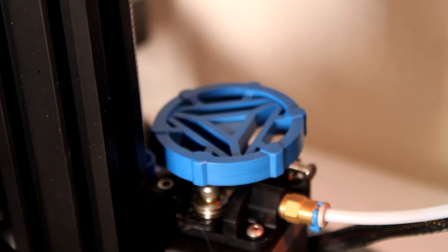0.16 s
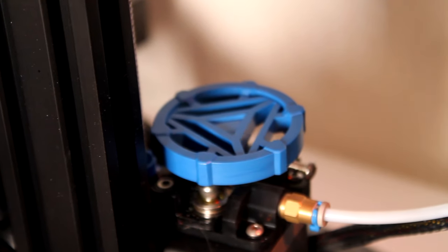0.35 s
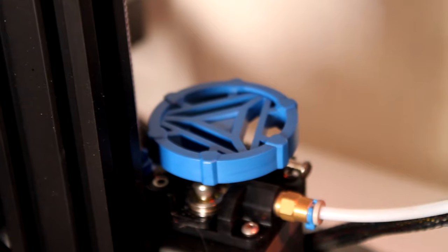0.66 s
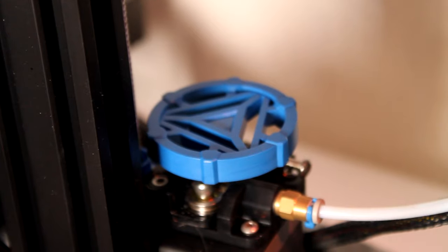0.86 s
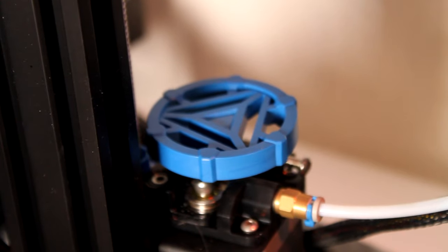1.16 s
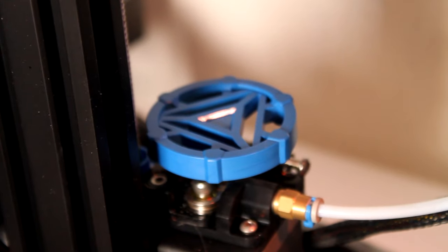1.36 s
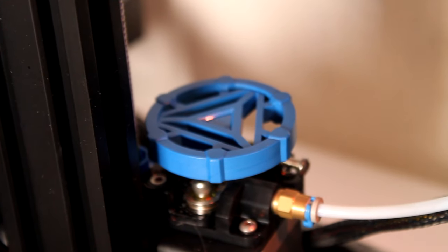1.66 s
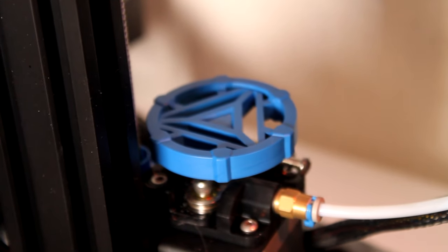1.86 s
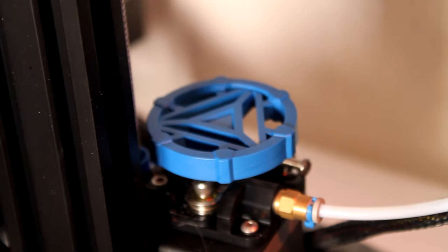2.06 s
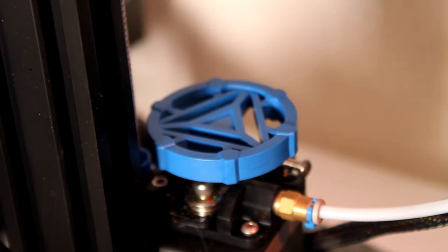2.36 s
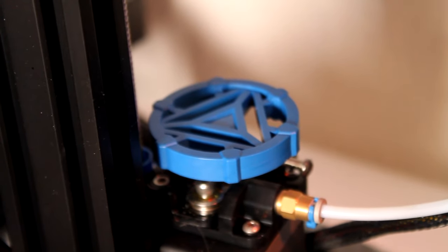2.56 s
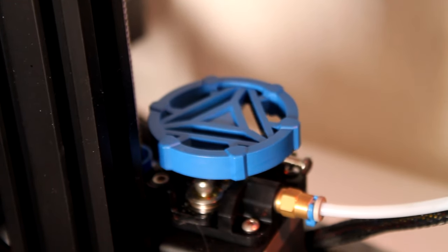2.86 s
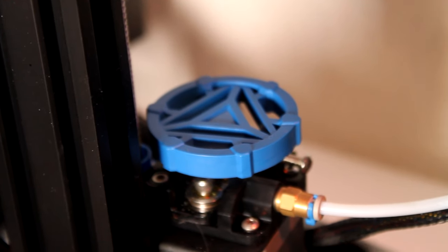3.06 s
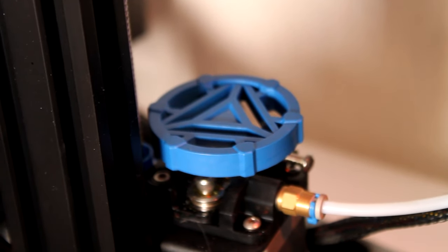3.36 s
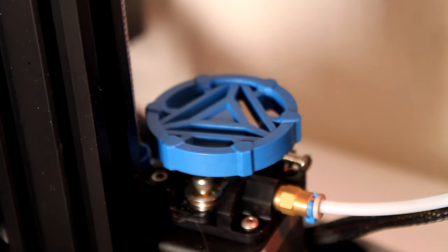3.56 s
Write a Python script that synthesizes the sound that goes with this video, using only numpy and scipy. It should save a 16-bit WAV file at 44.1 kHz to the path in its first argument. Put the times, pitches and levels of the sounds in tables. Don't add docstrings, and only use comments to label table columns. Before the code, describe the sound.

An extruder gear on a desktop 3D printer skips twice over continuous turbulent fan air with faint steady motor tones. The fan noise starts subdued and rises. At about 1.1 s comes a short, hard metallic snap with gritty crunch and dull frame knock; at 2.0 s a slightly longer crunch and heavier thump. After each, the background ducks, then recovers until 3.5 s. Small room, close phone microphone.

```python
import sys
import numpy as np
from scipy import signal
from scipy.fft import rfft, irfft
from scipy.io import wavfile

SR = 44100
rng = np.random.default_rng(int(sys.argv[2]) if len(sys.argv) > 2 else 0)


def field_ratio(decibels):
    return 10 ** (np.asarray(decibels, dtype=float) / 20)


def master_out(mix):
    frames = np.transpose(np.atleast_2d(mix))
    ceiling = np.clip(frames, -1, 1)
    pcm = np.round(ceiling * 32767).astype(np.int16)
    wavfile.write(sys.argv[1], SR, pcm)


N = 163611


def rms_one(x):
    return x / np.sqrt(np.mean(x ** 2) + 1e-20)


def since(s):
    return np.maximum(np.arange(N) / SR - s, 0)


def swell(t, peak_s):
    return t / peak_s * np.exp(1 - t / peak_s)


def drift(rate):
    hop = 40
    r = np.exp(-2 * np.pi * rate * hop / SR)
    slow = signal.lfilter([1], [1, -2 * r, r * r], rng.standard_normal(N // hop + 2002))[2000:]
    return np.interp(np.arange(N) / hop, np.arange(len(slow)), rms_one(slow))


def ring(force, hz, t60):
    r, w = field_ratio(-60 / (t60 * SR)), 2 * np.pi * hz / SR
    return signal.lfilter([0, np.sin(w)], [1, -2 * r * np.cos(w), r * r], force + 1e-18)


def sparse_impacts(per_s):
    return rng.standard_normal(N) * (rng.random(N) < per_s / SR)


def tooth_snap(t, snap_hz):
    burst_s, t60_s = .0011, .025
    envelope = (1 - np.exp(-t / burst_s)) ** 2 * np.exp(-np.log(1000) * t / t60_s)
    pair = np.sin(2 * np.pi * snap_hz * t) + .5 * np.sin(2 * np.pi * snap_hz * 0.96 * t)
    return 2 * envelope * pair


def feeder_crunch(t, length):
    # f/Hz, level/dB, t60/s
    feeder = [(1630, -9, 0.01), (2495, -10.5, 0.011), (3120, -4.5, 0.0077), (3850, -15.5, 0.011),
              (4340, -4, 0.0051), (5270, -10, 0.0089), (5590, -12, 0.0067), (6637, -7, 0.029),
              (7360, -17, 0.034), (10800, -10.5, 0.011), (11750, -13.5, 0.022), (13300, -12, 0.03),
              (15200, -23, .02)]
    rise_s, crunch_t60_s, rattle_t60_s, rattle_db = 0.00067, 0.083, 0.2, -13.5
    metal_db, crack_db, crack_fades = -4, -2, 0.83
    after, dying = np.maximum(t - length, 0), np.log(1000)
    decay = np.exp(-dying * after / crunch_t60_s)
    decay = decay + field_ratio(rattle_db) * np.exp(-dying * after / rattle_t60_s)
    shape = (1 - np.exp(-t / rise_s)) ** 2 * decay

    def grains(fades=1):
        return shape ** fades * rms_one(sparse_impacts(10000))

    metal = sum(field_ratio(level_db) * ring(grains(), hz, t60) / np.sqrt(t60 * SR / 30)
                for hz, level_db, t60 in feeder)
    crack = signal.lfilter([.5, .5], [1], grains(crack_fades))
    return field_ratio(metal_db) * metal + field_ratio(crack_db) * crack


def gear_bounces(t):
    # f/Hz, level/dB, t60/s
    bounced = [(6770, -15, 0.017), (10860, -19, .012), (13400, -27, .014)]
    hits = swell(t, .022) ** 2 * sparse_impacts(500)
    return sum(field_ratio(level_db) * ring(hits, hz, t60) for hz, level_db, t60 in bounced)


def frame_thump(t):
    # f/Hz, level/dB, swell/s
    frame = [(160, -12, .034), (335, -3, .021), (730, -9, .016), (1050, -8, .018)]
    modes = sum(field_ratio(level_db) * swell(t, peak_s) ** 4.5 * np.sin(2 * np.pi * hz * t)
                for hz, level_db, peak_s in frame)
    from_hz, to_hz, sag_s = 610, 490, .018
    turns = to_hz * t + (from_hz - to_hz) * sag_s * (1 - np.exp(-t / sag_s))
    knock = swell(t, .019) ** 3.3 * np.sin(2 * np.pi * turns)
    dull = signal.butter(2, [200, 1300], "band", fs=SR, output="sos")
    noise = rms_one(signal.sosfilt(dull, rng.standard_normal(N)))
    thud = field_ratio(-8.5) * swell(t, 0.02) * noise
    return modes + knock + thud


def skip(s, db, length, thump_db, snap_hz):
    t = since(s)
    bright = feeder_crunch(t, length) + gear_bounces(t) + field_ratio(-1.5) * tooth_snap(t, snap_hz)
    small_parts = signal.butter(2, 900, "high", fs=SR, output="sos")
    return field_ratio(db) * signal.sosfilt(small_parts, bright) + field_ratio(thump_db) * frame_thump(t)


def tones(lines, wobble_db):
    speed_wander = .0004
    turns = np.cumsum(1 + speed_wander * drift(1.53)) / SR
    total = 0
    for hz, db in lines:
        level = np.sqrt(2) * field_ratio(db + wobble_db * drift(3.6))
        total = total + level * np.sin(2 * np.pi * (hz * turns + rng.random()))
    return total


def rotor_hum():
    # [(multiple, rms level/dB)]
    rotors = [
        (122.8, [(1, -60), (4, -48), (5, -34), (9, -44)]),
        (156.2, [(5, -49), (8, -45), (10, -44), (16, -52)]),
        (531.3, [(3, -45), (4, -52), (6, -53), (7, -46), (8, -55), (9, -56)]),
    ]
    return sum(tones([(hz * k, db) for k, db in orders], .7) for hz, orders in rotors)


def motor_whine():
    # f/Hz, rms level/dB
    lone = [(139.5, -56), (284, -41), (350.3, -40), (2455, -53), (2923, -53), (3321, -52), (3852, -57),
            (5895, -60), (6110, -64), (7704, -66)]
    return tones(lone, 1.5)


def airflow():
    # f/Hz, level per Hz/dB
    broad = [(25, -25.5), (110, -29.5), (260, -16.5), (700, -11), (1500, -14.5), (4200, -20.5),
             (8500, -33.5), (15700, -43.5)]
    # f/Hz, width/Hz, boost/dB
    casing = [(134.7, 47, 7.5), (251, 34, -5), (334.7, 55, 7), (452, 49, -5.5), (650.5, 124, 8.5),
              (854, 75, 7.5), (897, 29, -1.5), (1023, 20, 8.5), (1182, 224, 4.5), (1559, 27, 5),
              (1850, 110, 5.5), (2558, 40, 6), (2760, 63, -2.5), (3480, 1900, 2.5), (6190, 500, -2),
              (7900, 600, 1.5), (9340, 1000, -2.5), (10440, 1400, 3)]
    air_db, flutter_db, flutter_hz = -26.5, 1, 2.7
    hz = np.maximum(np.arange(N // 2 + 1) * SR / N, 1)
    corner_hz, corner_db = np.array(broad).T
    db = np.interp(np.log(hz), np.log(corner_hz), corner_db)
    db = db + sum(boost * np.exp(-np.log(16) * ((hz - at) / width) ** 2) for at, width, boost in casing)
    db = db - 10 * np.log10(1 + (30 / hz) ** 8)
    air = rfft(rng.standard_normal(N)) * field_ratio(db)
    octave = np.clip(np.log2(hz / 31), 0, 9)
    total = 0
    for k in range(10):
        band = irfft(air * np.clip(1 - abs(octave - k), 0, 1), N)
        total = total + band * field_ratio(flutter_db * drift(flutter_hz))
    return field_ratio(air_db) * rms_one(total)


def scene():
    # t/s, level/dB, crunch length/s, thump level/dB, snap f/Hz
    skips = [
        (1.0727, -11.5, .002, -16.5, 4400),
        (1.9839, -12.5, .005, -14, 4950),
    ]
    mono = sum(skip(*row) for row in skips)
    mono = mono + field_ratio(.2) * (rotor_hum() + motor_whine())
    mono = mono + airflow()
    return np.array([mono, mono])


def band_limit(x):
    return signal.sosfilt(signal.butter(12, 16640, fs=SR, output="sos"), x)


def record(dry):
    # t/s, depth/dB
    ducks = [
        (-.08, 10.5),
        (1.075, 13),
        (1.984, 9),
    ]
    # t/s, low f/Hz, high f/Hz
    splits = [(.035, 4150, 11600), (.267, 9600, 13800), (1.452, 13050, 15200), (1.684, 9600, 12400),
              (2.195, 4600, 5700), (2.288, 4150, 8800), (2.473, 8950, 11100), (2.659, 4600, 9600),
              (2.891, 13700, 15200), (2.938, 5650, 6900), (3.309, 11000, 13100)]
    attack_s, release_s, split_s, split_db = 0.027, 0.32, .046, -3.5
    duck_db = sum(db * (1 - np.exp(-since(s) / attack_s)) * np.exp(-since(s) / release_s)
                  for s, db in ducks)
    top_cut = signal.ellip(10, .5, 58, 15620, fs=SR, output="sos")
    x = signal.sosfilt(top_cut, dry * field_ratio(-duck_db))
    hz = np.arange(N // 2 + 1) * SR / N
    other = rfft(np.roll(x[0], -SR // 10))
    side = 0
    for s, low, high in splits:
        window = np.cos(np.pi * np.clip((since(0) - s) / split_s, -.5, .5))
        side = side + window * irfft(other * (hz > low) * (hz < high), N)
    return band_limit(x + field_ratio(split_db) * side * [[1], [-1]])


dry = scene()
out = record(dry)
master_out(out)
```